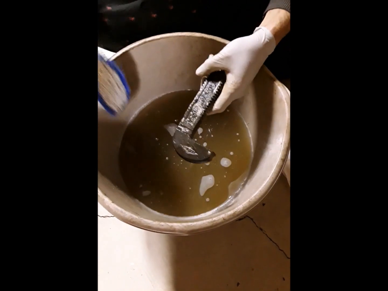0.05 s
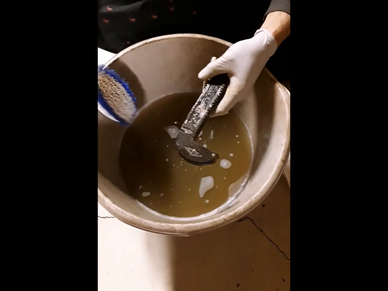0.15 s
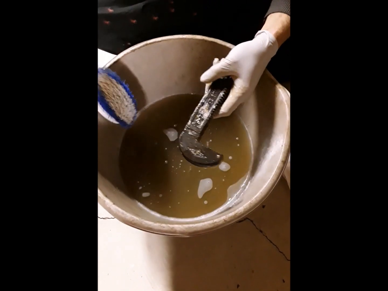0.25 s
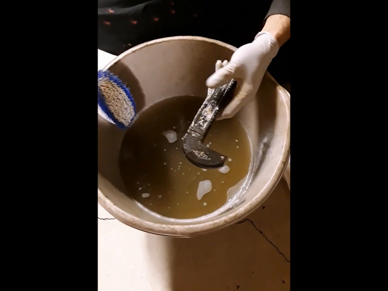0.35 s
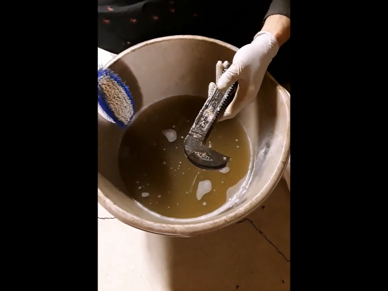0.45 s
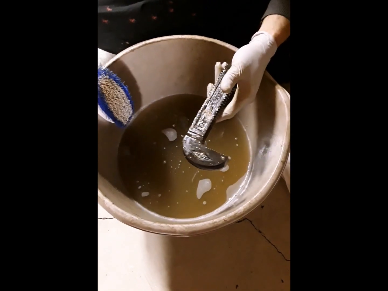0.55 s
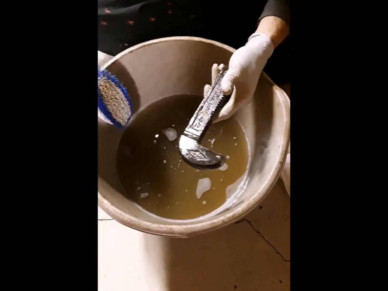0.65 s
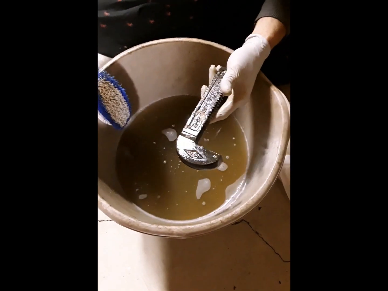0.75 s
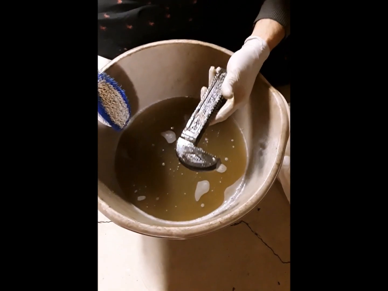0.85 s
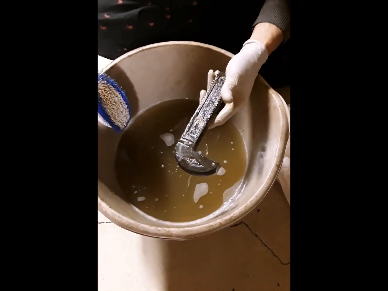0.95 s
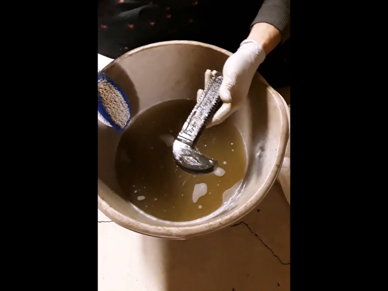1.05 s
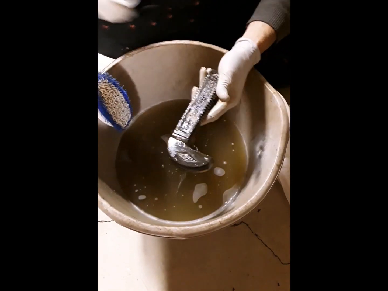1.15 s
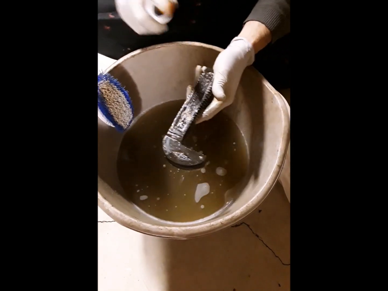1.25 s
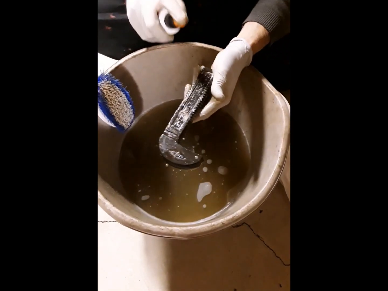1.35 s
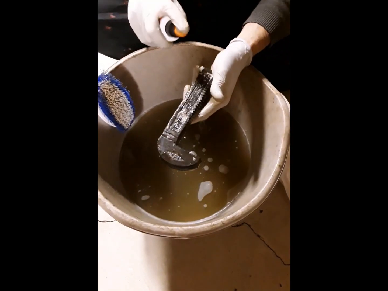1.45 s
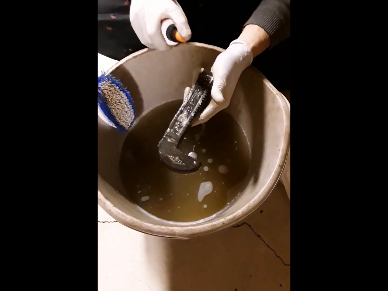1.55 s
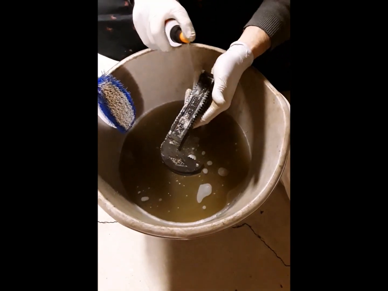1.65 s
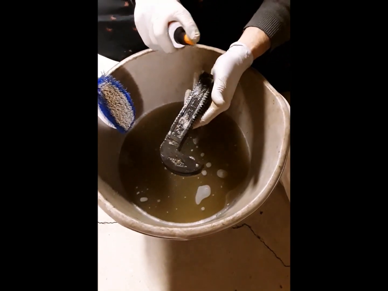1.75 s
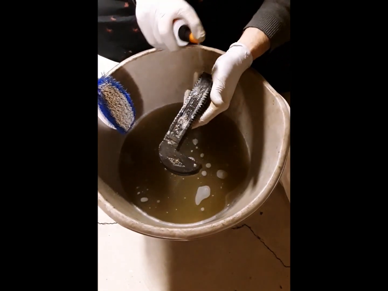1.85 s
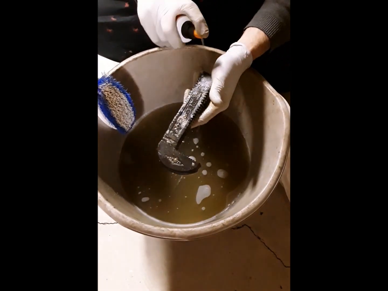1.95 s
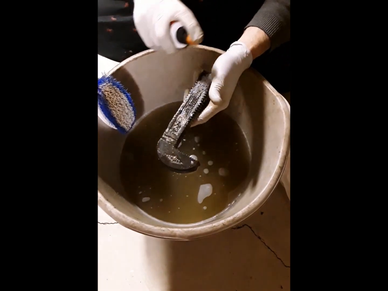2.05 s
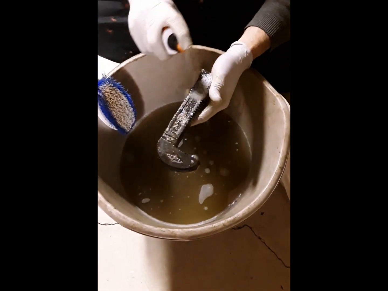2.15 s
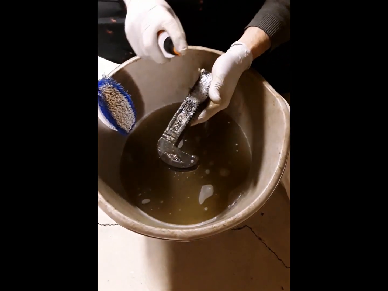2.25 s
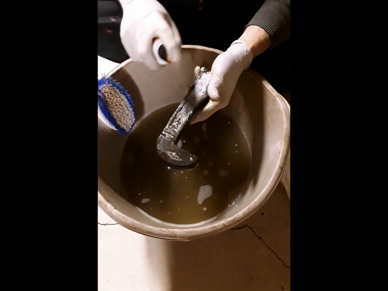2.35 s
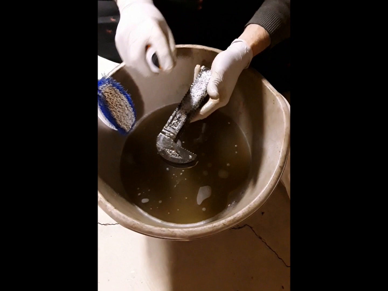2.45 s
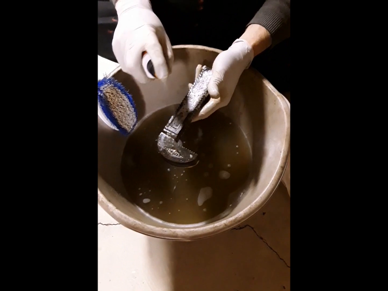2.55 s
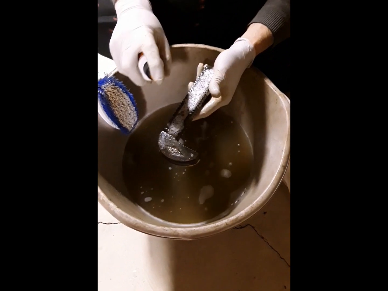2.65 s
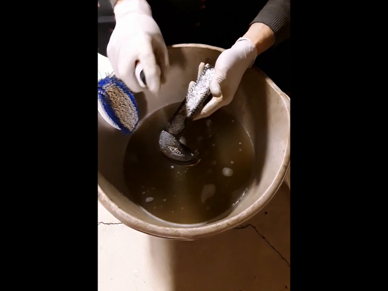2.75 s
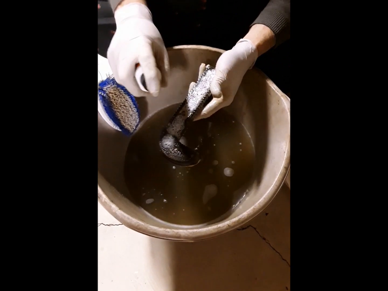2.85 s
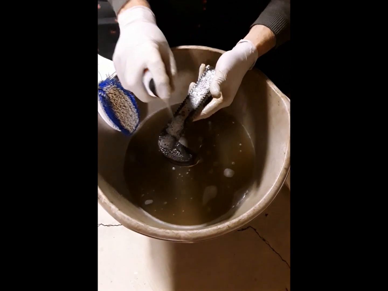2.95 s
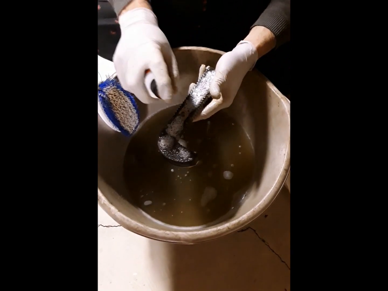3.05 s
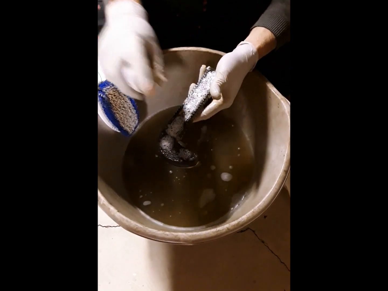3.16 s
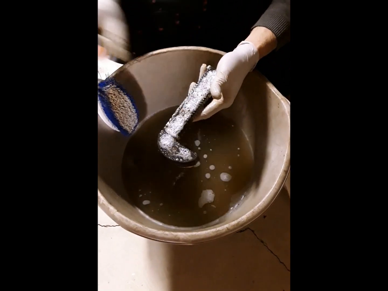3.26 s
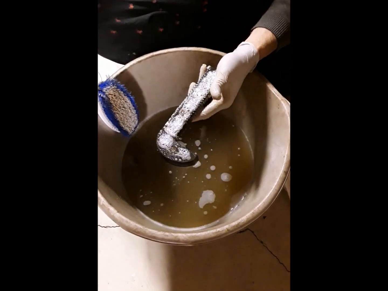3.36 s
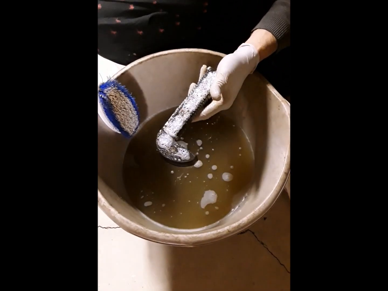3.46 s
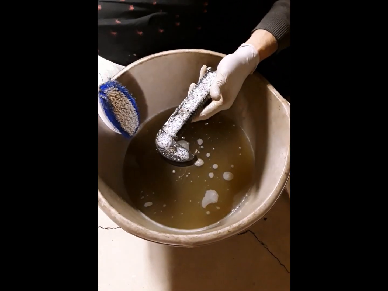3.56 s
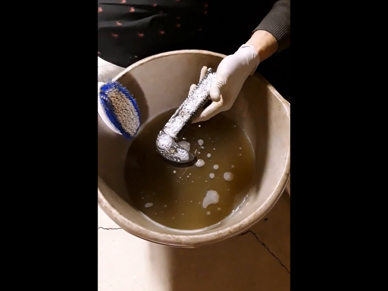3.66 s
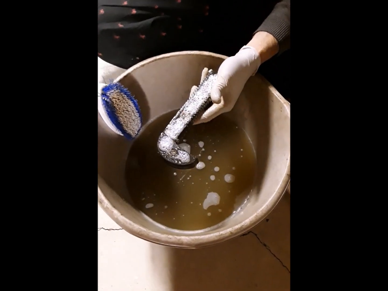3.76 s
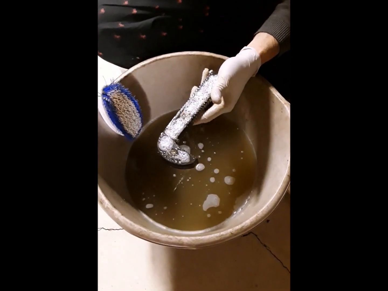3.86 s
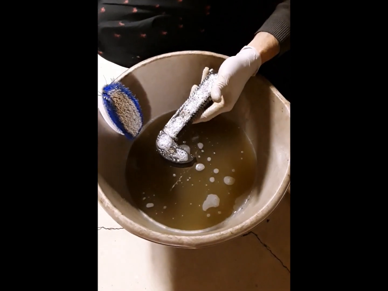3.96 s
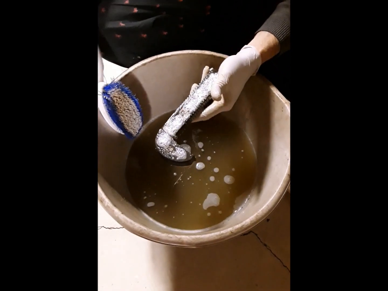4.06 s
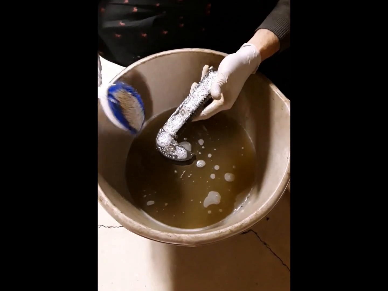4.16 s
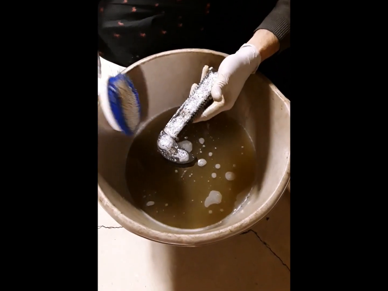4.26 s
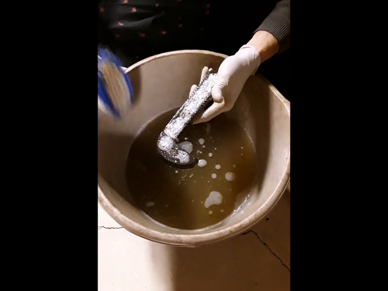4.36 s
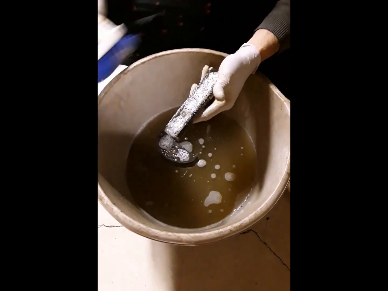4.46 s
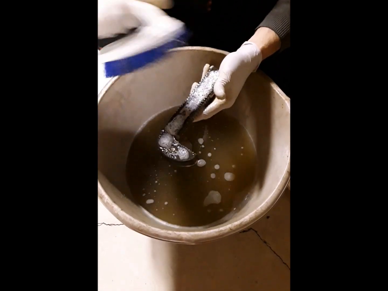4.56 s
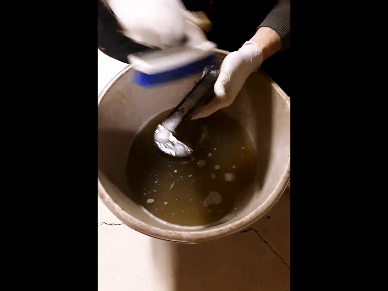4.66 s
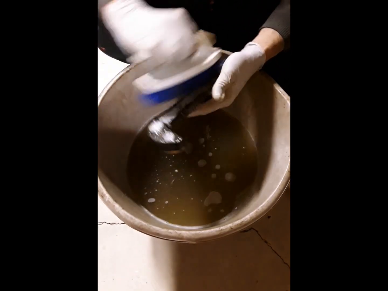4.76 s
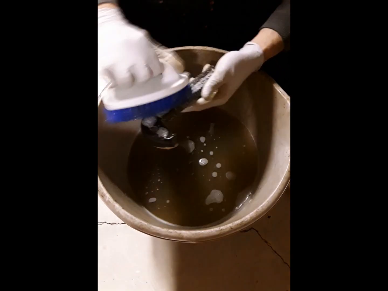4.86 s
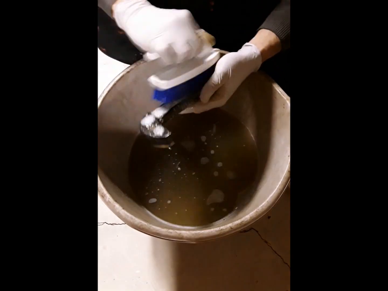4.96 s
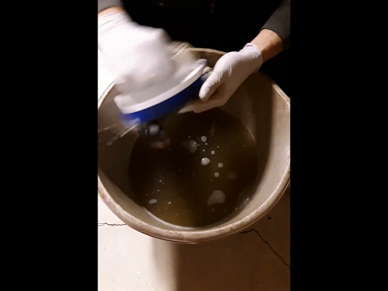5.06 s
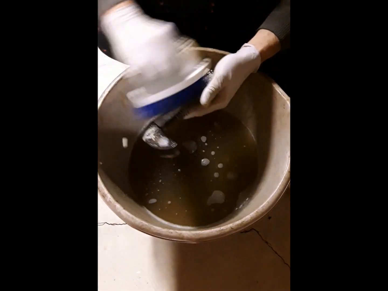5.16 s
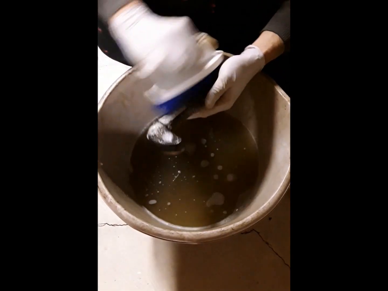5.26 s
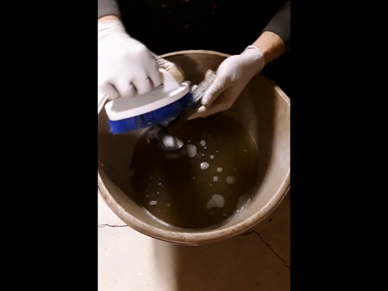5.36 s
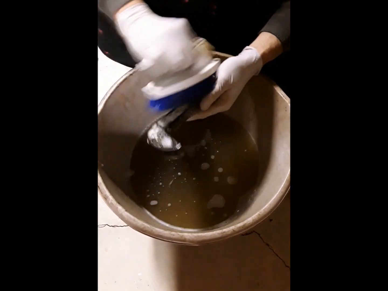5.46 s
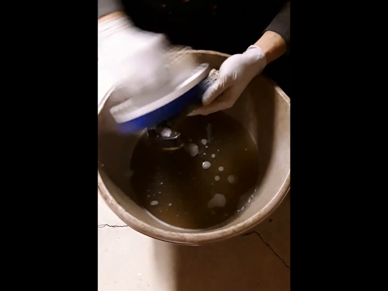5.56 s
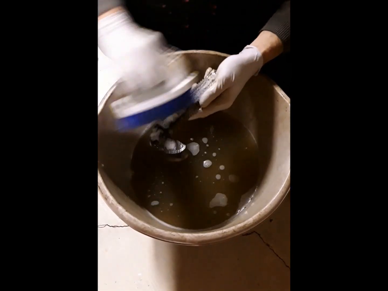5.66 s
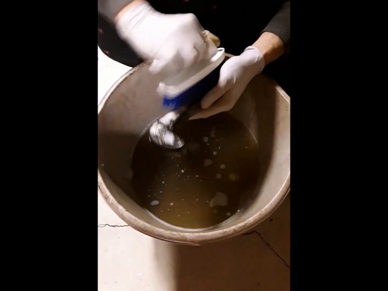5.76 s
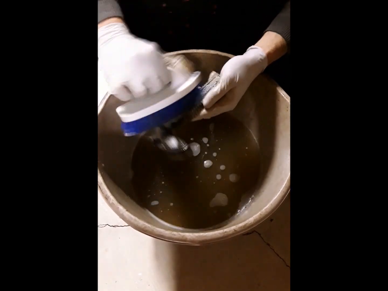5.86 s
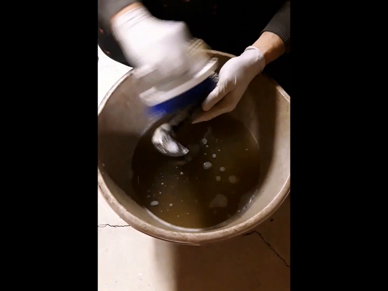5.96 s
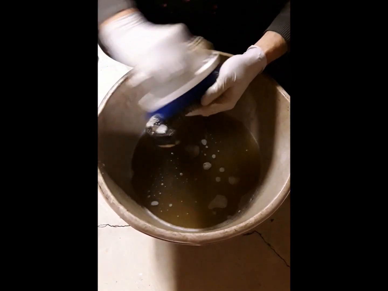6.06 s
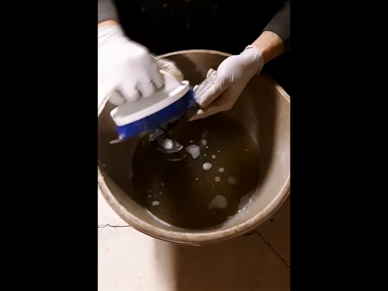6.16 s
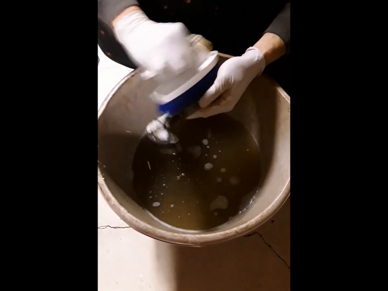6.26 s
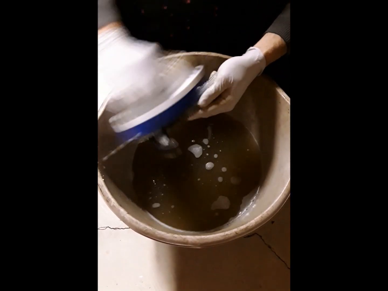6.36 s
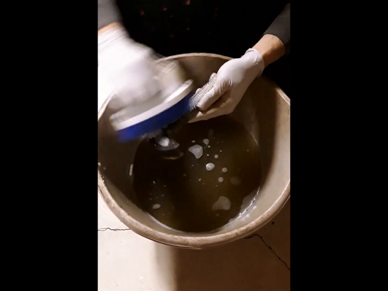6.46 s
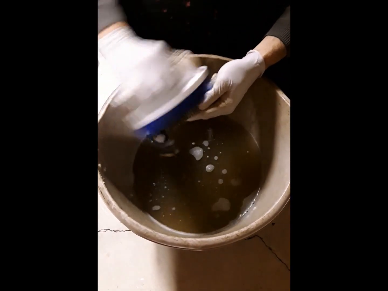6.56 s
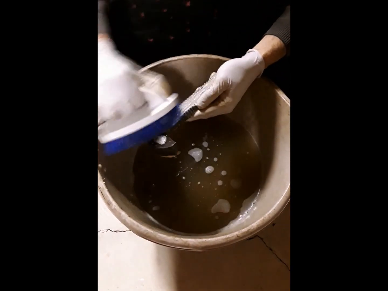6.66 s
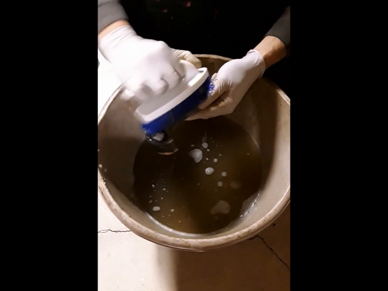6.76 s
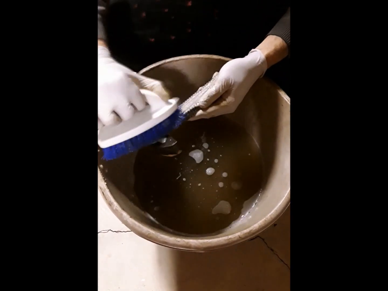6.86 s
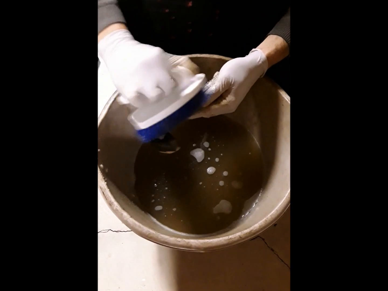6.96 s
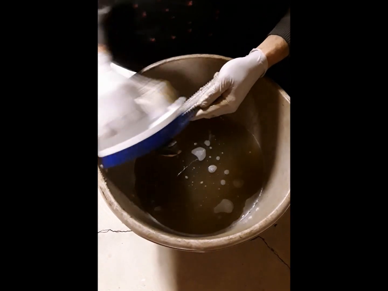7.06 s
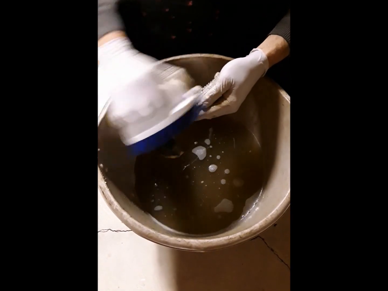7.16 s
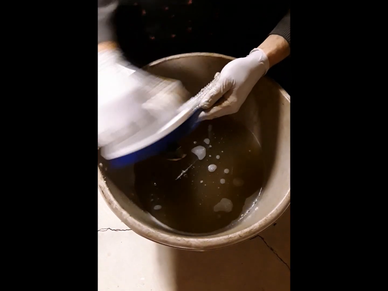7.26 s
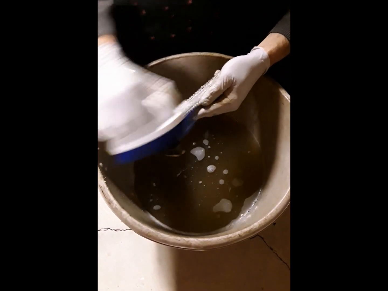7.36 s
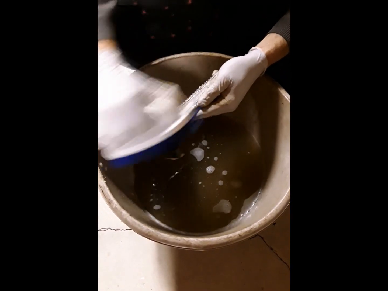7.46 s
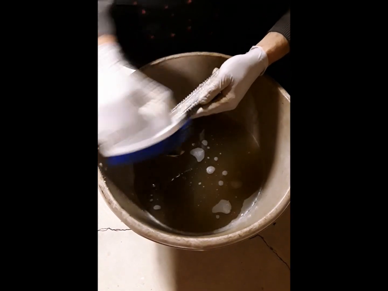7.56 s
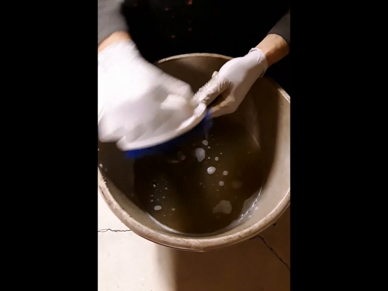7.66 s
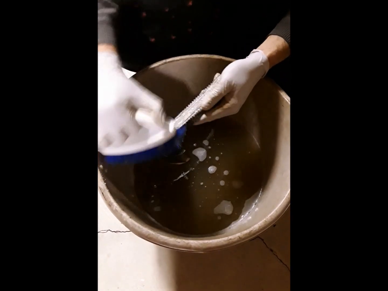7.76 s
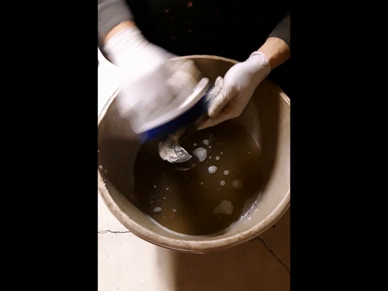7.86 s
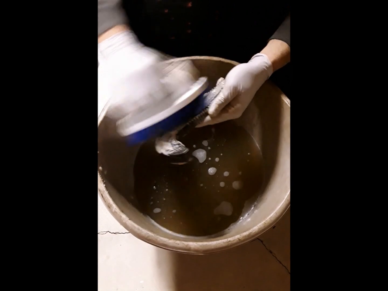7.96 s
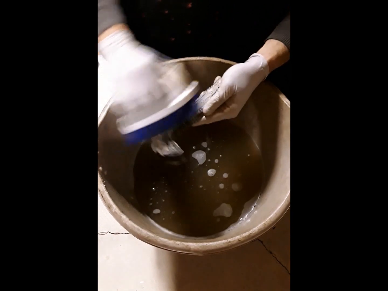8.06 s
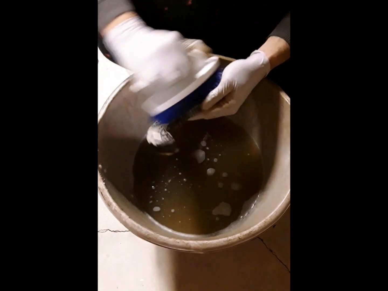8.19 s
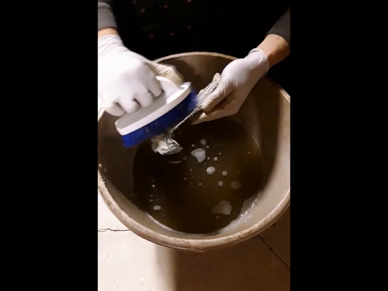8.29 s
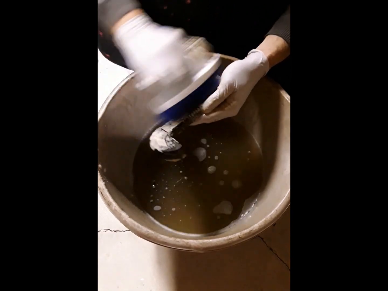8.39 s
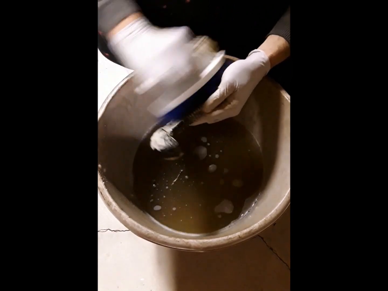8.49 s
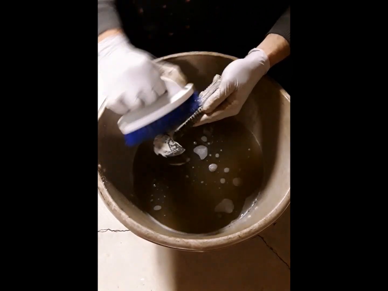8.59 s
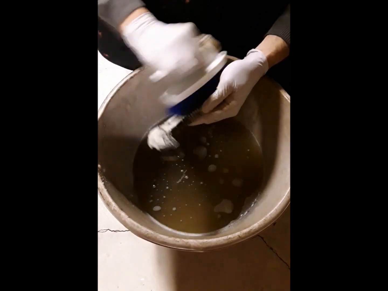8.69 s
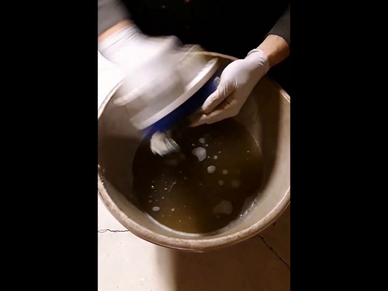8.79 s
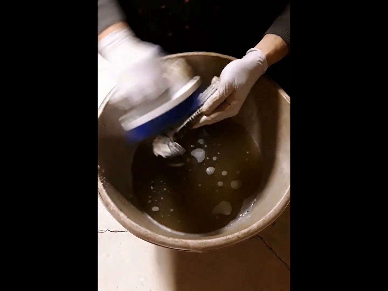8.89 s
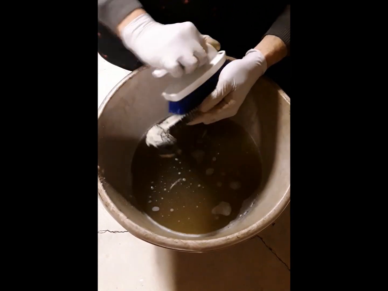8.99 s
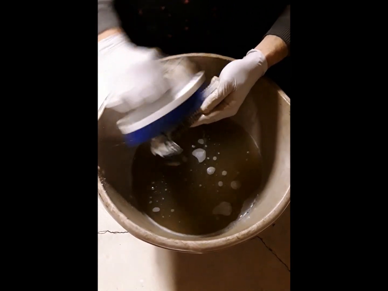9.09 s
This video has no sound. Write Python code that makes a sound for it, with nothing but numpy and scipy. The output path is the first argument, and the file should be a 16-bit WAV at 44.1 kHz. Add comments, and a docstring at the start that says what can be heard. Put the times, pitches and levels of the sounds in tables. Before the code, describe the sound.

A plastic brush knocks on a bucket, a finger pump sprays seven quick squelchy puffs, then stiff bristles scrub wet metal rapidly back and forth.

```python
"""A brush scrubs wet metal back and forth: noisy clicks of the bristles swell with every stroke.
Before that, the plastic brush knocks on a bucket: short bursts of noise over the ringing bucket wall.
A finger pump sprays seven times, with snaps, misty noise and sliding wet squelches; a metal tool bumps and rings.
Wet gloves rub and tick, and drops make tones that rise. Behind it all are a small room, still air and hum.
Both channels carry the same sound."""
import sys
import numpy as np
from scipy import signal
from scipy.fft import rfft, irfft
from scipy.io import wavfile
from scipy.ndimage import uniform_filter1d

SR = 44100
rng = np.random.default_rng(int(sys.argv[2]) if len(sys.argv) > 2 else 0)


def store_wav(level_fs):
    """Save 16-bit WAV to argv[1]."""
    pcm = np.round(np.clip(np.atleast_2d(level_fs), -1, 1) * 32767)
    wavfile.write(sys.argv[1], SR, pcm.T.astype(np.int16))


N = 402633
TIME = np.arange(N) / SR

# rasp against hiss, in dB: the back stroke is coarser
FORWARD_RASP_DB, BACK_RASP_DB = -20.5, -19
# low push of the arm: relative level, and its dB per dB of hiss
SHOVE_DB, SHOVE_FOLLOWS = -50.5, 0.17
# the push is early in the stroke; both numbers are in half strokes
SHOVE_LEAD, SHOVE_WIDTH = 0.37, 0.9
# crackle: relative level, its dB per dB of hiss, and how far it lags behind the strokes
CRACKLE_DB, CRACKLE_FOLLOWS, CRACKLE_LAG_S = -2, 1.374, 0.042
# the bristles land on the metal, and the crackle takes this long to come in
TOUCH_S, SETTLE_S = 4.86, 0.031

# brush strokes, forward and back in turn: (middle [s], length [s], relative bristle hiss [dB])
BRUSH_STROKES = [(4.935, .063, -20.5), (5.054, 0.059, -19.5), (5.183, 0.059, -17.5), (5.309, 0.046, -19.5),
                 (5.439, 0.068, -16), (5.569, .043, -18.5), (5.701, 0.055, -15), (5.839, 0.057, -20),
                 (5.956, 0.074, -16), (6.092, 0.048, -17.5), (6.221, 0.08, -16), (6.358, 0.053, -16.5),
                 (6.487, 0.078, -15), (6.619, 0.054, -14.5), (6.725, 0.053, -15), (6.845, 0.051, -18.5),
                 (6.952, 0.046, -19.5), (7.072, .047, -24.5), (7.172, 0.072, -23.5), (7.285, 0.055, -26),
                 (7.396, 0.068, -24), (7.502, 0.048, -26.5), (7.612, 0.054, -22.5), (7.714, 0.052, -26),
                 (7.84, 0.067, -25), (7.977, .11, -21.5), (8.099, 0.058, -16), (8.226, .073, -17),
                 (8.383, 0.077, -18), (8.511, .08, -15.5), (8.659, .078, -14.5), (8.79, .068, -14.5),
                 (8.936, .069, -14), (9.064, .067, -13.5)]
# resonances under the bristles: (pitch [Hz], width [Hz], lift [dB])
BRISTLE_RESONANCES = [(610, 100, 4), (1008, 69, 4), (2008, 136, 9.5), (2500, 110, 4), (2700, 126, 5.5),
                      (3540, 170, 5), (4180, 82, 1), (4590, 97, 0.5)]
# colour of the bright bristle hiss: (frequency [Hz], relative level [dB])
HISS_COLOUR = [(1500, -61.5), (2500, -18), (4000, -13), (5500, -10.5), (6300, -7.5), (7100, -2.5),
               (7700, -1.5), (8350, 1.5), (9200, -4), (10500, -11), (12500, -17.5), (16000, -21)]
# colour of the duller rasp: (frequency [Hz], relative level [dB])
RASP_COLOUR = [(300, -23), (450, -16), (600, -10), (850, -6.5), (1300, -3.5), (1800, 2), (2300, 0.5),
               (3200, -7.5)]
# colour of the fine spit of the wet bristle tips: (frequency [Hz], relative level [dB])
FIZZ_COLOUR = [(2500, -20), (4500, -22), (7000, -12), (8400, 4.5), (10500, 0), (13000, -5), (16000, -12)]
# colour of the low push of the arm: (frequency [Hz], relative level [dB])
PUSH_COLOUR = [(40, -17.5), (110, -9), (200, -7), (320, 7), (400, 2.5), (520, -10), (1000, -48)]


def scrubbing():
    """Bristles flick off the metal, strongest in mid-stroke; a crackle follows the strokes a little late."""
    hiss, rasp, push = np.zeros((3, N))  # these hold power, so that overlapping strokes add up
    for k, (s, length, db) in enumerate(BRUSH_STROKES):
        near = slice(round((s - 2 * length) * SR), round((s + 2 * length) * SR))
        u = 2 * (TIME[near] - s) / length  # -1 to 1 across the stroke
        steepness = np.where(u < 0, 3.8, 2.8)  # the bristles break loose faster than they stop
        speed = np.exp(-abs(u) ** steepness)
        rasp_db = BACK_RASP_DB if k % 2 else FORWARD_RASP_DB
        shove = np.exp(-((u + SHOVE_LEAD) / SHOVE_WIDTH) ** 2)
        hiss[near] += speed * amp(db) ** 2
        rasp[near] += speed ** 0.77 * amp(db + rasp_db) ** 2
        push[near] += shove * amp(SHOVE_DB + SHOVE_FOLLOWS * db) ** 2

    # the crackle runs on between strokes, filling the turns
    middles, _, stroke_db = np.transpose(BRUSH_STROKES)
    late_db = np.interp(TIME, middles + CRACKLE_LAG_S, stroke_db)
    touching = np.clip((TIME - TOUCH_S) / SETTLE_S, 0, 1)
    crackle = amp(CRACKLE_DB + CRACKLE_FOLLOWS * late_db) * touching

    tufts = flutter(rate_hz=54, depth_db=1.25)  # whole tufts catch and let go together
    bright = np.sqrt(hiss) * grains(per_s=30000, spread_db=-0.5) * amp(-0.14)
    bright += crackle * grains(per_s=1800, spread_db=4.0) * amp(-7.5)
    dull = np.sqrt(rasp) * grains(per_s=5000, spread_db=0.5) * amp(1)
    dull += crackle * grains(per_s=1500, spread_db=4) * amp(-23.5)
    # the small power keeps the fizz going even when the pressure is light
    fizz = hiss ** 0.31 * grains(per_s=6000, spread_db=-1.5) * amp(-18)
    low = np.sqrt(push) * amp(1.5) * rng.standard_normal(N)

    bristles = colour(bright * tufts, HISS_COLOUR, BRISTLE_RESONANCES)
    bristles += colour(dull * tufts, RASP_COLOUR, BRISTLE_RESONANCES)
    bristles += colour(fizz * tufts, FIZZ_COLOUR)
    # as the brush travels, other tufts touch the metal
    return shifting(bristles, depth_db=2.2) + colour(low, PUSH_COLOUR)


# the hollow clack lies between thud and crack in strength: offset [dB], and share of the way to the crack
CLACK_DB, CLACK_FROM_CRACK = -4.5, 0.48
THUMP_DB = -12.5  # deep thump against the thud
TOOL_HZ, TOOL_T60 = 379.5, 0.88  # ring of the metal tool; T60 in seconds, the time to fall by 60 dB
SOFT_BUMP_S, SOFT_THUMP_DB, SOFT_THUD_DB = 7.744, -40.5, -39  # a hand bumps the rim while scrubbing

# the plastic brush knocking on the bucket or the tool:
# (time [s], relative low thud [dB], relative sharp crack [dB])
BRUSH_KNOCKS = [(0.11, -19, -28), (0.2645, -17.5, -13.5), (0.275, -13.5, -22.5), (0.290, -28, -29),
                (0.316, -13.5, -24.5), (0.4215, -32, -30.5), (0.431, -27, -21.5), (0.528, -31, -26.5),
                (0.569, -47, -42), (0.587, -38, -39), (4.231, -51.5, -60.5), (4.327, -36, -33),
                (4.3625, -35.5, -26.5), (4.3995, -34, -28), (4.427, -34, -33.5), (4.474, -45, -33.5),
                (5.341, -47, -17.5), (5.86, -43, -23)]
# the metal tool nudging the bucket:
# (time [s], relative low thud [dB], relative sharp crack [dB], relative ring [dB])
TOOL_NUDGES = [(3.574, -50, -55.5, -57), (3.776, -35, -30, -42), (3.793, -38, -39, -66)]
# colour of the deep thump: (frequency [Hz], relative level [dB])
THUMP_COLOUR = [(25, -27.5), (55, -13), (110, 3), (200, 0), (300, -0.5), (600, -32)]
# colour of the hollow clack: (frequency [Hz], relative level [dB])
CLACK_COLOUR = [(150, -29), (400, -4.5), (750, -1), (950, -3.5), (1200, 1), (1500, -5), (1800, -6.5),
                (2200, -12.5), (4000, -21)]
# colour of the sharp crack: (frequency [Hz], relative level [dB])
CRACK_COLOUR = [(900, -31.5), (2300, -2), (3500, -2), (5000, -7.5), (6800, -1.5), (8300, 4.5), (9500, -6.5),
                (12000, -26.5), (16000, -37)]


def knocks():
    """Blows ring the bucket wall and add noisy bursts of thump, clack or crack; the tool rings on."""
    out = np.zeros(N)
    for s, thud_db, crack_db in BRUSH_KNOCKS:
        clack_db = thud_db + CLACK_FROM_CRACK * (crack_db - thud_db) + CLACK_DB
        add(out, s, amp(thud_db) * wall())
        add(out, s, amp(thud_db + THUMP_DB) * burst(THUMP_COLOUR, t60=0.15, spike=26))
        add(out, s, amp(clack_db) * burst(CLACK_COLOUR, t60=0.056, spike=4.2))
        add(out, s, amp(crack_db - 4.5) * burst(CRACK_COLOUR, t60=0.023, spike=13))
    for s, thud_db, crack_db, ring_db in TOOL_NUDGES:
        add(out, s, amp(thud_db) * wall() + amp(ring_db) * ring(TOOL_HZ, TOOL_T60))
        add(out, s, amp(crack_db - 6.0) * burst(CRACK_COLOUR, t60=0.023, spike=10))
    add(out, SOFT_BUMP_S, amp(SOFT_THUMP_DB) * burst(THUMP_COLOUR, t60=0.043, spike=11))
    add(out, SOFT_BUMP_S, amp(SOFT_THUD_DB) * wall())
    return out


# ringing tones of the bucket and brush back:
# (middling pitch [Hz], relative level [dB], time to fall by 60 dB [s])
BUCKET_TONES = [(119.5, -6, 0.074), (218.4, -4, 0.15), (256.5, 0.5, 0.059), (308.7, 2, 0.13),
                (343.4, 0, 0.11), (414.5, 0.5, 0.14), (562, -7, 0.118), (739, -9, 0.14), (815, -11.5, .13),
                (1023, -10.5, 0.1), (1208, -10, .12), (1803, -18, .07)]


def wall():
    """The bucket wall rings after one blow as a sum of dying tones, each a little off pitch; peak 1."""
    sound = np.zeros(SR)
    for hz, db, t60 in BUCKET_TONES:
        sound += amp(db) * rng.choice([-1, 1]) * ring(hz * rng.uniform(0.96, 1.02), t60)
    return sound / abs(sound).max()


# the pump head going down: (time [s], relative snap [dB], relative mist [dB], mist length [s])
PUMP_PRESSES = [(1.713, -27, -42.5, 0.092), (1.943, -15, -38, 0.17), (2.208, -12.5, -35.5, 0.13),
                (2.429, -9.5, -37.5, 0.12), (2.645, -8, -38.5, 0.13), (2.857, -7, -39, 0.13),
                (3.07, -7, -42, .115)]
# the pump springing back and sucking liquid: (time [s], relative level [dB])
PUMP_RETURNS = [(1.684, -47), (1.861, -38.5), (2.139, -33), (2.376, -35), (2.583, -33), (2.802, -33),
                (3.014, -32.5), (3.216, -31.5)]
# colour of the snap: (frequency [Hz], relative level [dB])
SNAP_COLOUR = [(200, -21), (430, -26), (580, -12), (1150, -32), (1800, -23), (3900, -9), (4800, -17.5),
               (5800, -5.5), (7000, -15), (8200, 8.5), (9300, -1), (12000, -16), (16000, -33)]
# colour of the mist: (frequency [Hz], relative level [dB])
MIST_COLOUR = [(300, -19.5), (600, -24.5), (1050, -19), (1500, -18), (4000, -18.5), (5700, -14),
               (7200, -4.5), (8400, 1.5), (10000, -6.5), (12500, -15), (16000, -19.5)]
# colour of the slurp: (frequency [Hz], relative level [dB])
SUCK_COLOUR = [(250, -30), (550, -6.5), (800, -3.5), (1150, -2), (1600, -13.5), (2100, -3.5), (3000, -11),
               (4000, -1), (5000, -11), (8400, 5), (10500, -10), (15000, -36)]


def sprayer():
    """The pump snaps down, mist hisses up and away, and the piston slurps back with wet squelches."""
    out, mist, suck = np.zeros((3, N))
    t = TIME[:SR // 3]
    for s, snap_db, mist_db, length in PUMP_PRESSES:
        add(out, s, amp(snap_db - 13.5) * burst(SNAP_COLOUR, t60=0.033, spike=5.2))
        # the seal creaks just before the snap
        add(out, s - .007, amp(snap_db - 47) * squelch(from_hz=1600, to_hz=1000, length=0.0077))
        add(out, s + 0.00083, amp(snap_db - 30.5) * squelch(from_hz=1600, to_hz=590, length=0.01))
        add(mist, s, amp(mist_db) * np.exp(-abs((t / length - .55) / 0.34) ** 2.7))
    for s, db in PUMP_RETURNS:
        gulp = np.exp(-((t - .02) / 0.0063) ** 2)
        tail = amp(-29) * (t > .02) * np.exp(-t / 0.029)
        add(suck, s - .02, amp(db) * (gulp + tail))
        creak_hz = 2100 * rng.uniform(0.76, 1.2)
        add(out, s - .011, amp(db - 11.5) * squelch(from_hz=creak_hz, to_hz=1080, length=0.0097))
        # the chamber refills
        add(out, s + .012, amp(db - 24.5) * squelch(from_hz=730, to_hz=1190, length=0.022))
    spray = colour(mist * rng.standard_normal(N), MIST_COLOUR)
    slurp = colour(suck * grains(per_s=7000, spread_db=2.5), SUCK_COLOUR)
    return out + spray + amp(-0.5) * slurp


def squelch(from_hz, to_hz, length):
    """Liquid forced through the valve: a short noisy resonance that slides in pitch."""
    u = np.arange(int(length * SR)) / (length * SR)
    hz = from_hz * (to_hz / from_hz) ** u
    sound = resonate(rng.standard_normal(len(u)), hz, width=320)
    return evened(resonate(sound, hz, width=1600)) * np.sin(np.pi * u) ** 0.71


# each movement grips quickly, eases off (time constant) and dies away
RUB_ATTACK_S, RUB_RELEASE_S, RUB_TIRES_DB_PER_S = .012, .017, 14.5

# gloves and bristles shifting:
# (start [s], length [s], relative dull rub [dB], relative bright rustle [dB])
MOVEMENTS = [(0.145, 0.054, -54, -48.5), (0.2, 0.067, -46, -40), (0.60, .015, -57, -53),
             (0.798, .015, -68, -55), (0.853, .02, -72, -53), (1.028, 0.11, -82, -62),
             (1.115, 0.013, -49, -62), (1.187, .065, -54, -51), (1.265, .095, -60, -59),
             (3.27, 0.14, -73, -59.5), (3.59, .17, -78.5, -63), (3.772, 0.024, -46, -40),
             (3.906, .015, -64, -60), (4.235, .07, -62, -79), (4.298, 0.027, -42, -59),
             (4.37, 0.075, -40.5, -42.5), (4.467, 0.043, -40, -37.5), (4.529, .11, -62, -59),
             (4.806, 0.028, -50.5, -34), (4.851, .04, -57, -42)]
# small wet ticks of glove, nozzle and drops: (time [s], relative level [dB])
WET_TICKS = [(0.248, -12), (1.123, -33.5), (1.165, -36), (1.197, -39), (1.395, -35.5), (1.463, -30.5),
             (1.648, -35), (1.724, -22.5), (1.911, -41), (1.968, -23), (1.984, -20.5), (2.004, -27),
             (2.219, -17), (2.450, -24), (3.278, -27), (3.328, -32), (3.540, -37), (3.645, -31.5),
             (4.569, -22.5)]
# bubbles ringing in the liquid: (time [s], starting pitch [Hz], level [dB])
BUBBLES = [(1.462, 2100, -57), (3.540, 2930, -48), (3.027, 1060, -43), (3.227, 1090, -42),
           (4.470, 1150, -32), (4.486, 1090, -38), (4.569, 2270, -43.5), (5.341, 610, -33.5)]
# colour of the dull rub: (frequency [Hz], relative level [dB])
RUB_COLOUR = [(120, -16.5), (330, 0.5), (550, -4), (750, -3), (1200, -5), (1900, -3), (2600, -13),
              (5000, -29.5)]
# hollow resonances that a rubbing glove excites: (pitch [Hz], width [Hz], lift [dB])
HOLLOW_RESONANCES = [(348, 90, 6), (730, 100, 9.5), (1201, 150, 6.5), (1880, 240, 6.5)]
# colour of the bright rustle and the ticks: (frequency [Hz], relative level [dB])
RUSTLE_COLOUR = [(1500, -37.5), (2600, -21.5), (5300, -20), (7000, -11.5), (8400, -1.5), (9500, -9),
                 (11500, -28.5), (16000, -27)]


def small_sounds():
    """Wet gloves rub and tick, and drops trap bubbles whose pitch rises."""
    out, rub, rustle = np.zeros((3, N))
    t = TIME[:SR // 2]
    for s, length, rub_db, rustle_db in MOVEMENTS:
        grip = np.minimum(t / RUB_ATTACK_S, 1) * amp(-RUB_TIRES_DB_PER_S * t)
        move = grip * np.exp(-np.maximum(t - length, 0) / RUB_RELEASE_S)
        add(rub, s, amp(rub_db) * move)
        add(rustle, s, amp(rustle_db) * move)
    for s, db in WET_TICKS:
        add(out, s, amp(db - 17.5) * burst(RUSTLE_COLOUR, t60=0.03, spike=8))
    for s, hz, db in BUBBLES:
        add(out, s, amp(db) * ring(hz, t60=0.04, glide=1.3))
    hollow_rub = colour(rub * grains(per_s=550, spread_db=2.5), RUB_COLOUR, HOLLOW_RESONANCES)
    out += amp(-3.5) * shifting(hollow_rub, depth_db=5.0)
    return out + amp(-2.0) * colour(rustle * grains(per_s=1600, spread_db=-0.5), RUSTLE_COLOUR)


AIR_DB = -66.5  # average (rms) level

# steady tones: mains hum and one other tone: (pitch [Hz], rms level [dB])
HUM_TONES = [(120, -78), (240, -72), (360, -79.5), (479.5, -74.5), (538, -82)]
# colour of the still air: (frequency [Hz], relative level [dB])
AIR_COLOUR = [(25, -13), (60, -3.5), (130, -3.5), (200, -1), (300, -5.5), (450, -10.5), (700, -13),
              (1200, -20), (2500, -24), (5200, -30.5), (7000, -23), (8400, -12.5), (10000, -26),
              (15000, -34)]


def background():
    """Still air is soft coloured noise; a faint mains hum and one other steady tone are sine tones."""
    hum = np.zeros(N)
    for hz, db in HUM_TONES:
        hum += amp(db) * np.sqrt(2) * np.sin(2 * np.pi * (hz * TIME + rng.random()))
    return hum + amp(AIR_DB) * colour(rng.standard_normal(N), AIR_COLOUR)


# how long the workshop's echoes last: (frequency [Hz], time to fall by 60 dB [s])
ROOM_DECAY = [(150, 0.2), (500, 0.26), (2000, 0.21), (8000, 0.2), (15000, 0.2)]


def reflections(x, delay):
    """The room answers with sparse echoes of random sign, each band dying at its own speed."""
    sign = rng.choice([-1., 1.], SR // 2)
    taps = sign * (rng.random(SR // 2) < .1) * (TIME[:SR // 2] > delay)
    hz, t, z = signal.stft(taps, SR, nperseg=128)
    fade = amp(-60 * t / read(ROOM_DECAY, hz)[:, None])
    tail = signal.istft(z * fade, SR, nperseg=128)[1]
    return signal.oaconvolve(x, tail / np.linalg.norm(tail))[:N]


def amp(db):
    """Turns decibels into a gain."""
    return 10 ** (np.asarray(db) / 20)


def evened(x):
    """Scales a sound to an average (rms) level of 1."""
    return x / np.sqrt(np.mean(x ** 2) + 1e-20)


def read(points, hz):
    """Reads a table between its points on a log-frequency axis."""
    f, value = np.transpose(points)
    return np.interp(np.log(hz + 1), np.log(f), value)


def add(mix, s, sound):
    """Mixes a sound in at time s."""
    part = mix[max(round(s * SR), 0):][:len(sound)]
    part += sound[:len(part)]


def colour(x, spectrum, resonances=(), size=4096):
    """Filters with the given spectrum and resonances, without pre-echo and with unit energy."""
    hz = np.fft.rfftfreq(size, 1 / SR)
    db = read(spectrum, hz)
    # beyond either end of the table the level falls by 12 dB an octave
    db = db - 12 * np.log2(np.maximum(spectrum[0][0] / (hz + 10), 1))
    db = db - 12 * np.log2(np.maximum(hz / spectrum[-1][0], 1))
    for f, width, lift in resonances:
        db = db + lift / (1 + (2 * (hz - f) / width) ** 2)
    # keeping half the cepstrum gives a filter that acts as early as it can (minimum phase)
    cepstrum = irfft(np.log(amp(db)))
    cepstrum[size // 2:] = 0
    cepstrum[0] = 0
    taps = irfft(np.exp(rfft(2 * cepstrum)))
    return signal.oaconvolve(x, taps / np.linalg.norm(taps))[:len(x)]


def grains(per_s, spread_db):
    """Random clicks of uneven size, rms 1."""
    size = amp(spread_db * np.minimum(rng.exponential(1, N), 4))
    return evened(size * rng.choice([-1, 1], N) * (rng.random(N) < per_s / SR))


def flutter(rate_hz, depth_db):
    """A gain that wanders at random, made from slowed-down noise."""
    hz = np.fft.rfftfreq(N, 1 / SR)
    slow = irfft(rfft(rng.standard_normal(N)) / (1 + (hz / rate_hz) ** 4), N)
    return evened(amp(depth_db * evened(slow)))


def burst(spectrum, t60, spike):
    """A sharp contact and its quickly dying rattle; rms 1 over the first 5 ms."""
    t = TIME[:SR // 4]
    drive = rng.standard_normal(len(t)) * amp(-60 * t / t60)
    drive[0] += spike
    sound = colour(drive, spectrum)
    return sound / np.sqrt(np.mean(sound[:SR // 200] ** 2))


def ring(hz, t60, glide=0):
    """One dying tone, whose pitch may rise by the share glide each second."""
    t = TIME[:SR]
    return np.sin(2 * np.pi * hz * (t + glide * t ** 2 / 2)) * amp(-60 * t / t60)


def resonate(x, hz, width):
    """A resonance that follows the curve hz: shift down to zero, smooth, shift back up."""
    turn = np.exp(2j * np.pi * np.cumsum(hz) / SR)
    r = np.exp(-np.pi * width / SR)
    return 2 * (turn * signal.lfilter([1 - r], [1, -r], x / turn + 1e-18)).real


def shifting(x, depth_db, size=(12, 3)):
    """The colour drifts in random patches; size is (time frames, frequency bins)."""
    z = signal.stft(x, SR, nperseg=512, noverlap=384)[2]
    patches = uniform_filter1d(rng.standard_normal(z.shape), size[0], 1)
    patches = uniform_filter1d(patches, size[1], 0)
    gain = evened(amp(depth_db * evened(patches)))
    return signal.istft(z * gain, SR, nperseg=512, noverlap=384)[1][:N]


def scene():
    """Everything sounds straight ahead, with a little of the room."""
    near = scrubbing() + knocks() + sprayer() + small_sounds()
    mono = near + amp(-13.5) * reflections(near, delay=.008) + background()
    return np.array([mono, mono])


EDGE_HZ = 16000


def record(dry):
    """A steep low-pass filter takes away what lies above the edge."""
    taps = signal.firwin(511, EDGE_HZ, window=("kaiser", 9), fs=SR)
    return signal.oaconvolve(dry, taps[None], "same")


dry = scene()
out = record(dry)
store_wav(out)
```